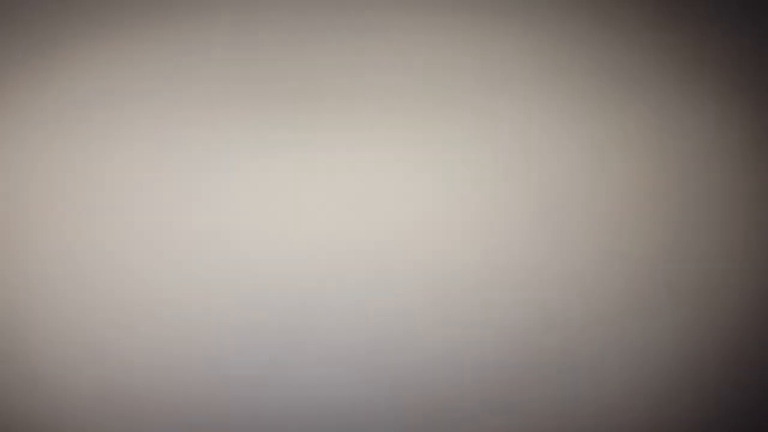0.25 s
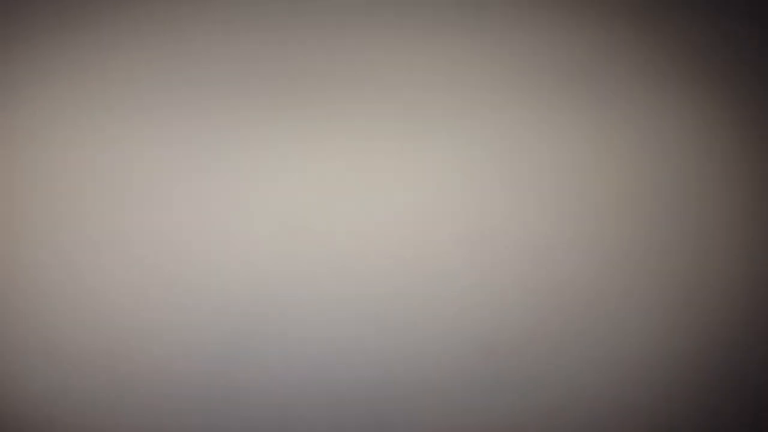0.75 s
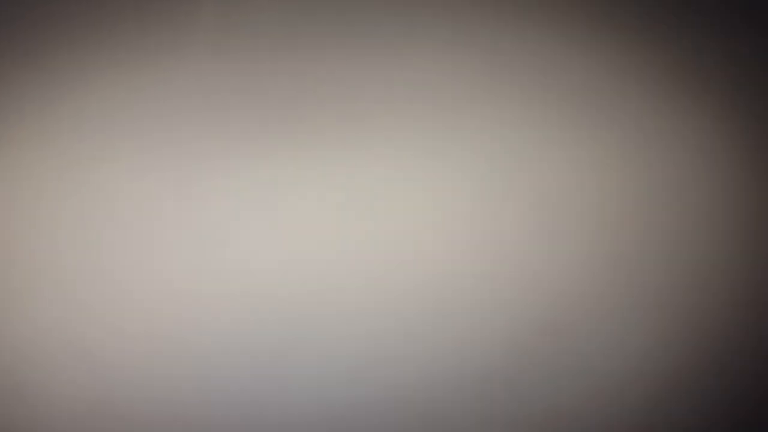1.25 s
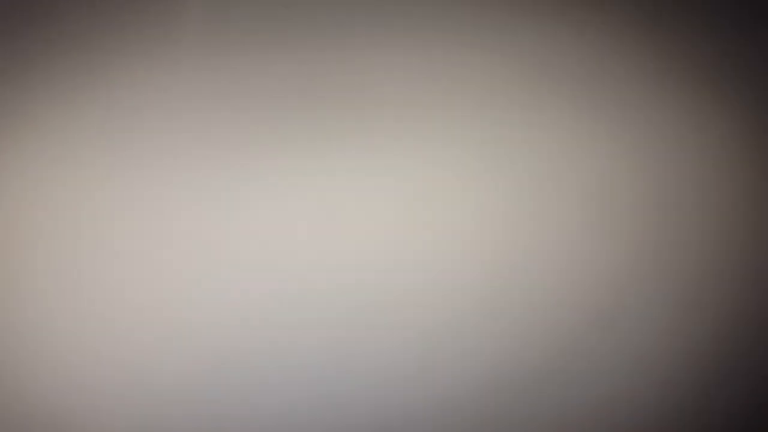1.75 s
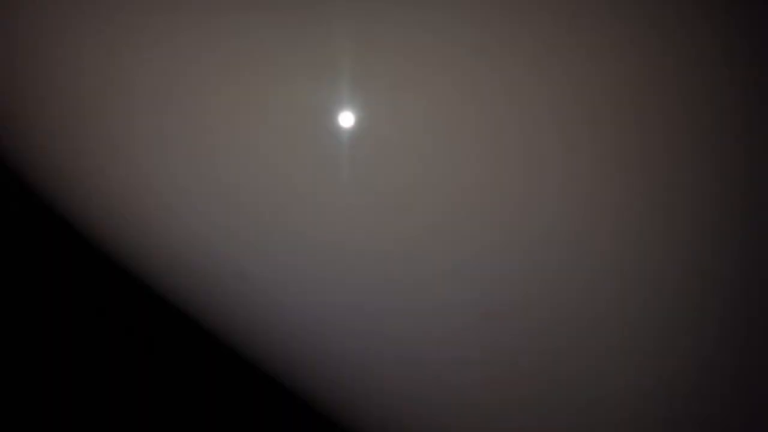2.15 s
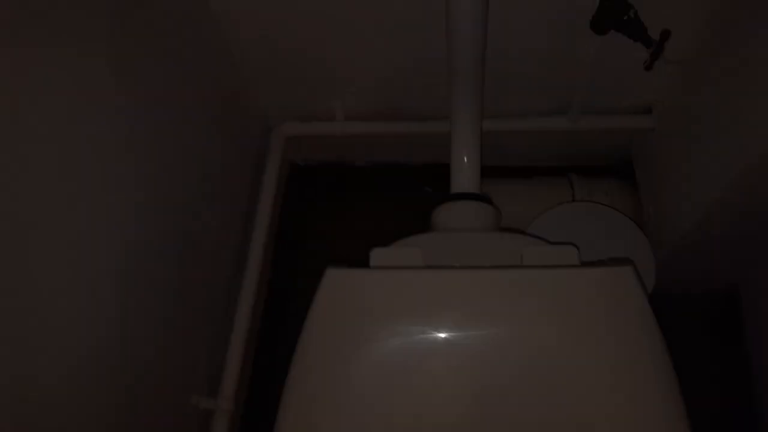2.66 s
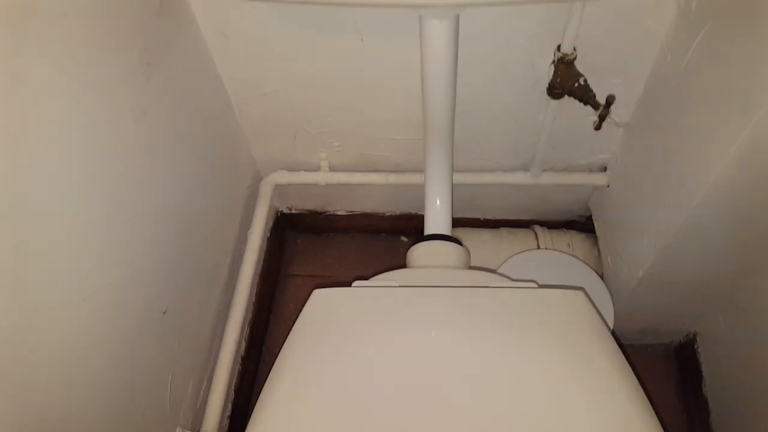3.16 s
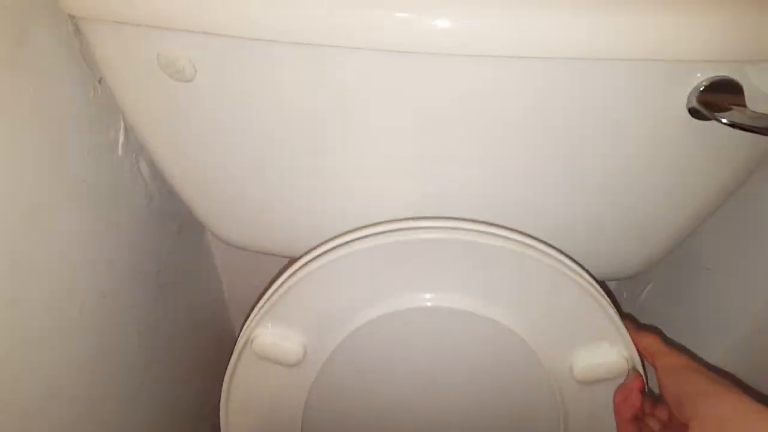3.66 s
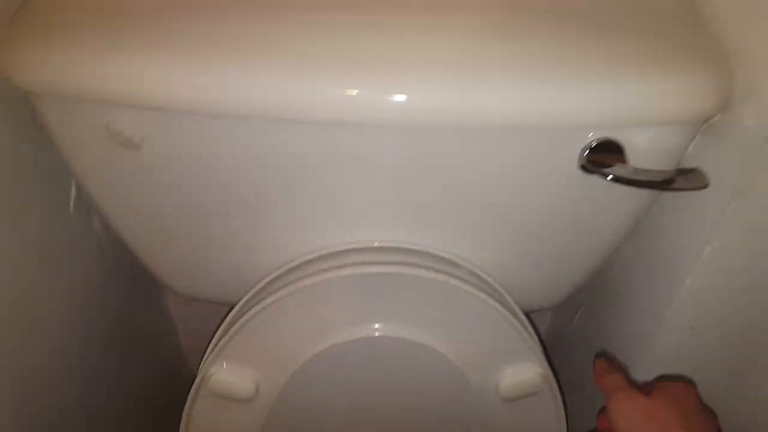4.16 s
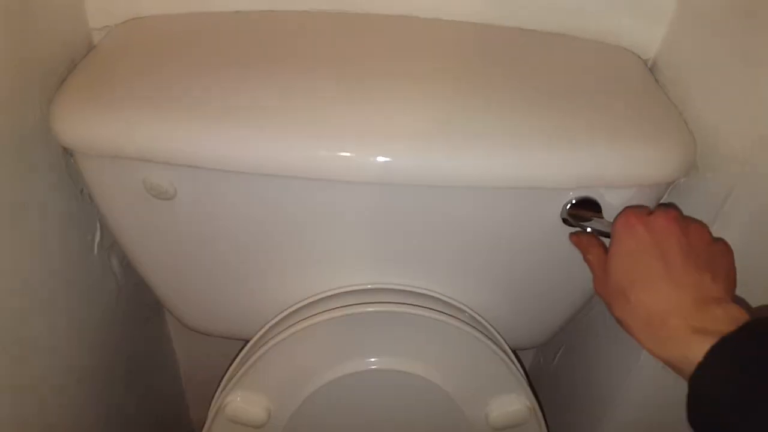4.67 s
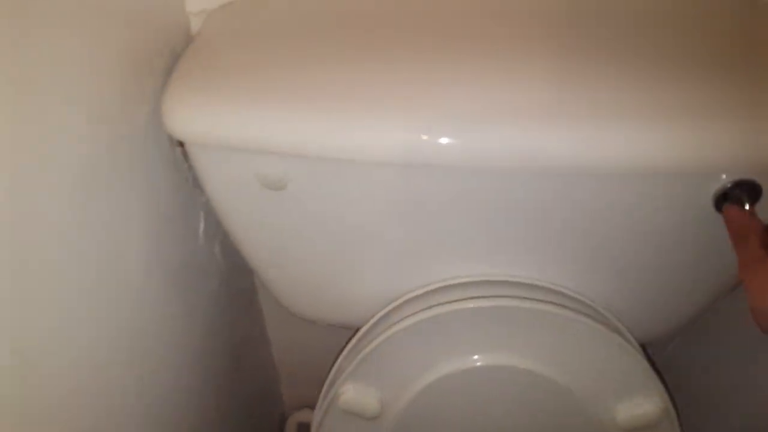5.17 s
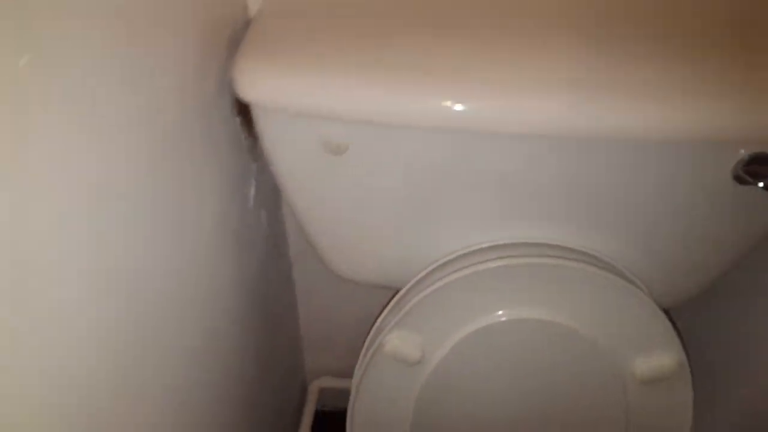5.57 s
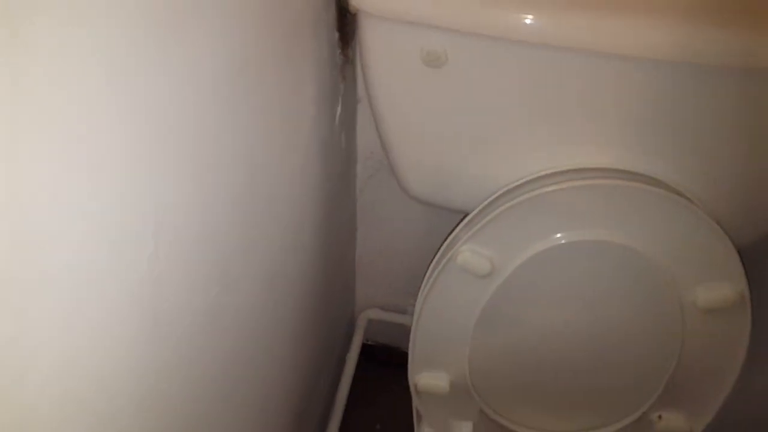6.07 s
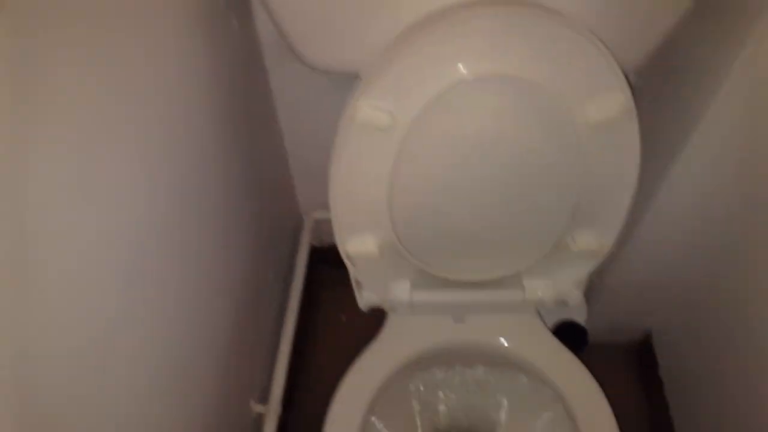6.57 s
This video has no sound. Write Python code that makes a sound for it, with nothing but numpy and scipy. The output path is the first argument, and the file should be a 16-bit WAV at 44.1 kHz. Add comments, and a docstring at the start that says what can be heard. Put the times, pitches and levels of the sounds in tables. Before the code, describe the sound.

Hollow porcelain knocks and a short drag, light plastic seat clatter, then a loud flush-lever clank and a trickle growing into splashing, bubbling toilet flush.

```python
"""Cistern lid, seat and flush in a tiled toilet cubicle

The porcelain lid is knocked, dragged and set down; the plastic seat lifts and falls against the cistern.
Fingers touch the lever, it clanks, and water trickles, then rushes into the bowl, heard by a hand-held phone.
Blows ring an object's modes and the air, with noise dying between the tiles; rubbing and water shape noise.
"""
import sys
import numpy as np
from scipy import signal
from scipy.fft import rfft, irfft, next_fast_len
from scipy.io import wavfile
from scipy.ndimage import uniform_filter1d, minimum_filter1d, map_coordinates

SR = 44100
rng = np.random.default_rng(int(sys.argv[2]) if len(sys.argv) > 2 else 0)


def dump(signal):
    """Clip the signal to [-1, 1] and save it as 16-bit WAV at the path in sys.argv[1]."""
    limited = np.clip(np.atleast_2d(signal).T, -1, 1)
    pcm = np.round(limited * 32767).astype(np.int16)
    wavfile.write(sys.argv[1], SR, pcm)


def level_to_linear(level):
    """Convert decibel levels to linear amplitude factors, elementwise."""
    exponent = np.asarray(level, float) / 20
    return 10 ** exponent


N = 300762

# air resonances of the cubicle: mode_hz, level_db, t60_s
AIR_MODES = [(63, -32.5, 0.36), (101.3, -27, 1), (141.2, 5, 0.3), (179.8, 1.5, 0.3), (238, 0.5, 0.12),
             (271.2, 2.5, 0.11), (358.1, 0, 0.17), (417, -4.5, 0.28)]
# building rumble colour: freq_hz, relative_db_per_hz
RUMBLE = [(15, -31.5), (25, -8), (65, -1), (194, 0.5), (253, -5), (316, -0.5), (448, -4), (545, -35.5),
          (700, -14.5), (910, -29.5), (1540, -120)]
# treble colour of background noise and rubbing: freq_hz, relative_db_per_hz
BRIGHT = [(1760, -28), (3000, -26), (3730, -9), (4170, -5), (5140, -8), (5920, -9), (13400, -13.5),
          (16000, -19.5)]
# balance of the lid between the ports: freq_hz, left_minus_right_db
LID_LEAN = [(60, 1.5), (240, -2), (800, 3), (3770, 1), (15000, 9.5)]
LID_LEAD_S = 0.00013  # the lid is nearer the left port


def unit(x):
    """Scale to rms 1."""
    return x / np.sqrt(np.mean(x ** 2) + 1e-20)


def along(points, hz):
    """Interpolate (Hz, value) points on a log axis."""
    f, v = np.transpose(points)
    return np.interp(np.log(hz + 1), np.log(f + 1), v)


def curves(rows):
    """One value per sample for each dB column; -120 dB from 30 ms outside the rows."""
    s, *cols = np.transpose(rows)
    s = np.r_[s[0] - .03, s, s[-1] + .03]
    return [np.interp(np.arange(N) / SR, s, np.r_[-120, c, -120]) for c in cols]


def wobble(rate_hz):
    """Smooth random curve through rate_hz random knots a second."""
    knots = rng.standard_normal(int(N * rate_hz / SR) + 4)
    return map_coordinates(knots, [np.arange(N) * rate_hz / SR])


def filtered(x, response):
    """Multiply the spectrum of x by a complex response of frequency."""
    m = next_fast_len(N + SR // 2)
    return irfft(rfft(x, m) * response(np.fft.rfftfreq(m, 1 / SR)), m)[..., :N]


def coloured(spectrum):
    """Gain of a (Hz, dB) spectrum."""
    return lambda hz: level_to_linear(along(spectrum, hz))


def lean(balance, lead_s=0):
    """Level and time difference between the ports."""
    half = np.array([[.5], [-.5]])
    return lambda f: level_to_linear(along(balance, f) * half) * np.exp(2j * np.pi * f * lead_s * half)


def turn(hz):
    """Angle between the two microphone ports: small in the bass, wide in the treble."""
    # likeness of the two ports: freq_hz, likeness_0_to_1
    alike = [(25, 1), (60, 0.8), (150, 1), (380, 0.9), (950, 0.16), (2380, 0), (5980, 0.049), (15000, 0)]
    return np.arccos(np.clip(along(alike, hz), 0, 1)) / 2


def rush(gain, patchy_db):
    """Stereo noise of rms 1, its gain varying in random patches of time and frequency."""
    z = signal.stft(rng.standard_normal((2, N)), nperseg=512)[2]
    field = uniform_filter1d(rng.standard_normal(z.shape[1:]), size=5, axis=0)
    field = uniform_filter1d(field, size=8, axis=1)
    pair = signal.istft(z * level_to_linear(patchy_db * unit(field)), nperseg=512)[1][:, :N]
    mid, side = filtered(pair, lambda hz: gain(hz) * [np.cos(turn(hz)), np.sin(turn(hz))])
    return unit(np.array([mid + side, mid - side]))


def ringing(modes):
    """Causal response of (Hz, dB, t60) modes: damped resonators."""
    return lambda f: sum(level_to_linear(db) * 1j * f * 2.2 / t60 / (hz * hz - f * f + 2.2j * f / t60)
                         for hz, db, t60 in modes)


def clatter(size):
    """Stereo noise in which each frequency dies as fast as the tiles let it."""
    # decay between the tiles: freq_hz, t60_s
    tiles = [(100, 0.54), (500, 0.29), (1500, 0.25), (4000, 0.22), (10000, 0.18)]
    hz, t, z = signal.stft(rng.standard_normal((2, size)), SR, nperseg=256)
    angle = turn(hz)[:, None]
    mid, side = z * level_to_linear(-60 * t / along(tiles, hz)[:, None]) * [np.cos(angle), np.sin(angle)]
    return signal.istft(np.array([mid + side, mid - side]), SR, nperseg=256)[1][:, :size]


def tiled(x, wet_db):
    """The sound plus its decaying, noise-like answer from the tiles."""
    tail = clatter(SR // 2)
    answer = signal.fftconvolve(x, tail / np.linalg.norm(tail[0]), axes=1)[:, :N]
    return x + level_to_linear(wet_db) * answer


def blows(table, colour_db, modes, boom_db, clatter_db, crack_db, spread, soft_s=0.00034):
    """Each row: a crack, the object's modes, the boom of the air and the clatter off the tiles."""
    # bands of a blow: centre_hz, width_hz
    bands = [(140, 120), (330, 300), (750, 500), (1800, 2000), (6000, 9000)]
    # share of a blow's weight_db reaching each band: share
    weight_share = np.array([0.83, 0.94, 0.2, 0.02, 0.38])
    # share of a blow's hardness_db reaching each band: share
    hard_share = np.array([0, 0.0056, 0.025, 0.32, 1])
    twin_hz, twin_share = 22, .22  # a weaker twin up to this far off makes each mode beat
    top_hz, top_db, top_share = 13000, -10, 0.15  # top treble re the 6 kHz band, raised by hardness
    rings, out = np.zeros((2, 2, N + SR))
    t, lead = np.arange(SR // 2) / SR, 512
    centre, width = np.transpose(bands)
    hz, level, t60 = np.transpose(AIR_MODES + modes)[..., None]
    level = level + boom_db * (np.arange(len(hz))[:, None] < len(AIR_MODES))
    contact = 1 - np.exp(-t / soft_s)
    rise = (1 - np.exp(-t * hz / 0.29)) ** 2 * contact  # about a cycle, more after a soft contact
    grid = np.fft.rfftfreq(len(t) + lead, 1 / SR)
    edges = grid ** 2 / (grid ** 2 + 110 ** 2) / (1 + (grid / 9000) ** 2)  # small objects radiate no deep bass
    for s, db, weight_db, hard_db in table:
        band_db = db + np.array(colour_db) + weight_db * weight_share + hard_db * hard_share
        mode_db = along(np.transpose([centre, band_db]), hz) + level
        size = level_to_linear(mode_db + rng.normal(0, 2.2, hz.shape))
        shift = spread * turn(hz) * rng.uniform(-6.5, 4.7, hz.shape)  # each mode reaches one port first
        beat = twin_hz * rng.uniform(.3, 1, hz.shape) * t + rng.random(hz.shape)
        size = size * (1 + twin_share * np.sin(2 * np.pi * beat))
        decay = size * rise * level_to_linear(-60 * t / t60)
        ring = [(decay * np.sin(2 * np.pi * hz * t + side * shift)).sum(axis=0) for side in (.5, -.5)]
        crack = 1 + level_to_linear(crack_db - 60 * t / 0.0085)
        noise = np.pad(clatter(len(t)) * crack * contact, ((0, 0), (lead, 0)))
        per_hz = np.transpose([centre, band_db + clatter_db - 10 * np.log10(width / (SR / 2))])
        per_hz = np.r_[per_hz, [[top_hz, per_hz[-1, 1] + top_db + top_share * hard_db]]]
        at = round(s * SR)
        rings[:, at:][:, :len(t)] += np.array(ring)
        out[:, at - lead:][:, :len(t) + lead] += irfft(rfft(noise) * level_to_linear(along(per_hz, grid)) * edges)
    return out[:, :N] + tiled(rings[:, :N], wet_db=-8.5)


def rubbing(rows, hiss_db, modes, ring_db, boom_db, rough_db, grit_db, rate_hz):
    """Uneven friction keeps the air, the object's modes and a gritty hiss going."""
    low_db, mid_db = curves(rows)
    grip_db = rough_db * wobble(rate_hz)

    def body(f):
        return level_to_linear(ring_db) * abs(ringing(modes)(f)) + 1

    def air(f):
        return level_to_linear(boom_db) * abs(ringing(AIR_MODES)(f))

    def below(f, hz):
        return 1 / (1 + (f / hz) ** 4)

    boom = rush(lambda f: (body(f) + air(f)) * (1 - below(f, 130)) * below(f, 590), patchy_db=3.5)
    ring = rush(lambda f: body(f) * (1 - below(f, 500)) * below(f, 3100), patchy_db=2.5)
    shrill = rush(lambda f: (body(f) + level_to_linear(grit_db)) * coloured(BRIGHT)(f) * below(f, 12000), patchy_db=2.5)
    return level_to_linear(low_db) * boom + level_to_linear(mid_db + grip_db) * ring + level_to_linear(mid_db + hiss_db + grip_db) * shrill


def bubbles(s, db, hz, pan_db, turns):
    """Short rising tones with a soft start, one per entry."""
    t = np.arange(1500) / SR
    age = t * hz[:, None] / turns
    swell = level_to_linear(db)[:, None] * age * np.exp(1 - age)
    tone = swell * np.sin(2 * np.pi * hz[:, None] * t * (1 + .012 * age))
    at = (np.round(s * SR).astype(int)[:, None] + np.arange(len(t))).ravel()
    return np.array([np.bincount(at, (tone * level_to_linear(side * pan_db)[:, None]).ravel(), N + len(t))[:N]
                     for side in (.5, -.5)])


def mic_hiss():
    """The microphone's own noise: steady coloured noise."""
    # hiss colour: freq_hz, relative_db_per_hz
    hiss = [(20, 7), (80, 12.5), (400, -8), (3000, -21.5), (16000, -29)]
    return level_to_linear(-59) * rush(coloured(hiss), patchy_db=-2.0)


def building():
    """Low noise of the building, its level drifting."""
    # building rumble: time_s, level_db
    rumble = [(0, -50.5), (.65, -47.5), (2.2, -50.5), (2.66, -60), (2.85, -46.5), (3.7, -49), (4.63, -54),
              (4.85, -40.5)]
    rumble_db, = curves(rumble)
    return level_to_linear(rumble_db + 1.1 * wobble(44)) * rush(coloured(RUMBLE), patchy_db=4.5)


def air_noise():
    """Background air noise, a dull and a bright layer whose level dips and recovers together."""
    # background air noise: time_s, level_db
    floor = [(0, -48), (.156, -53), (.634, -55.5), (.756, -47), (.888, -56), (1.05, -55.5), (1.65, -49),
             (1.78, -91.5), (1.98, -50.5), (2.12, -56.5), (2.42, -54.5), (2.66, -61.5), (2.8, -55.5),
             (3.17, -55), (3.28, -56), (3.43, -48.5), (3.54, -54), (3.7, -53.5), (3.95, -54), (4.35, -62.5),
             (4.85, -60.5)]
    # dull layer's colour: freq_hz, relative_db_per_hz
    dull = [(290, -25), (500, -6), (529, -3.5), (676, -7.5), (1340, -10.5), (1700, -9.5), (3500, -15.5),
            (4550, -57), (7700, -120)]
    bright_db = -6  # re the dull layer
    floor_db, = curves(floor)
    flicker = wobble(14)
    return (level_to_linear(floor_db + 0.5 * flicker) * rush(coloured(dull), patchy_db=3.0)
            + level_to_linear(floor_db + bright_db + 1.2 * flicker) * rush(coloured(BRIGHT), patchy_db=.6))


def low_hum():
    """Low wavering hum, dropping sharply near 1.7 s, then slowly creeping back."""
    # hum tones: pitch_hz, waver_knots_per_s, level_db (before the gain curve)
    tones = [(184, 14, -53), (257, 17, -56), (763, 8.08, -67), (1730, 6.9, -76.5)]
    # gain curve of the hum: time_s, gain_db
    gain = [(0, 4), (.7, 1.5), (1.6, 4), (1.75, -30), (6.82, -10)]
    t = np.arange(N) / SR
    hum = 0
    for hz, rate_hz, db in tones:
        level = level_to_linear(db + 1.0 * wobble(rate_hz)) * np.sqrt(2)
        hum = hum + level * np.sin(2 * np.pi * hz * t + 1.4 * wobble(rate_hz))
    gain_db, = curves(gain)
    return level_to_linear(gain_db) * filtered(hum, lean(LID_LEAN, LID_LEAD_S))


def hinge():
    """Faint breathy whistle of the seat hinge: noise in resonant bands."""
    # seat swinging up: time_s, level_db
    swing = [(3.4, -49), (3.68, -76), (3.75, -53), (3.89, -67)]
    # whistle bands: centre_hz, half_width_hz, level_db
    bands = [(2140, 120, -2), (12200, 700, -11)]
    swing_db, = curves(swing)
    whistle = rush(lambda f: sum(level_to_linear(db) / (1 + ((f - hz) / w) ** 2) for hz, w, db in bands), patchy_db=7.0)
    return level_to_linear(swing_db) * whistle


def fingers():
    """Soft, modeless touches of the fingers, booming in the air."""
    # touches: start_s, level_db, weight_db (bass), hardness_db (treble)
    touches = [(2.264, -62, -13, 21), (2.545, -67, -13, 20), (2.574, -61.5, -2, 14), (4.612, -53.5, -8, -2),
               (4.743, -14.5, -22.5, -33.5), (4.865, -27.5, -14, -31)]
    # colour of skin contact: band_db
    skin_db = (1.3, 6.6, 0.5, 3.6, 0.5)
    return blows(touches, skin_db, [], boom_db=-6.5, clatter_db=-4, crack_db=-49, spread=0.78)


def seat():
    """The plastic seat lifts and falls, each knock ringing its modes."""
    # seat knocks: start_s, level_db, weight_db (bass), hardness_db (treble)
    knocks = [(2.737, -53, -3.5, 1), (2.94, -65.5, 20, 3), (2.96, -33.5, -5.5, -6.5),
              (3.022, -58, 10.5, 12), (3.077, -46.5, -4, -22), (3.11, -81, -7.5, 31.5),
              (3.153, -64, -8, 10), (3.227, -46, -4, -17.5), (3.342, -58.5, 4.5, 22.5),
              (3.384, -56.5, -1.5, 6), (3.542, -64.5, -0.5, 22.5), (3.62, -78, -15, 24),
              (3.662, -70.5, 9, 20.5), (3.897, -23, -16.5, 7.5), (3.915, -37, 2, -9), (4.088, -41, -8, -45),
              (4.21, -53, -2, -34.5)]
    # colour of a knock on plastic: band_db
    plastic_db = (5, 1.5, -1.5, 5, 1.96)
    # seat resonances: mode_hz, level_db, t60_s
    modes = [(910, -4, .2), (1217, -6, .2), (1397, 0, .16), (1577, -1, .14), (1653, -2, .12),
             (1814, -3, .13), (2140, -1, .12), (2412, 3, .13), (3500, -6, .06), (4900, -8, .05)]
    # seat balance between the ports: freq_hz, left_minus_right_db
    balance = [(60, 1), (240, -1.5), (950, 2), (3770, 1.5), (15000, 15.5)]
    knocking = blows(knocks, plastic_db, modes, boom_db=9.0, clatter_db=3, crack_db=8, spread=0.81)
    return filtered(knocking, lean(balance))


def lever():
    """The lever thumps the cistern water and clanks, the full cistern's ring swells, the linkage rubs."""
    # lever going down: start_s, level_db, weight_db (bass), hardness_db (treble)
    plunge = [(4.953, -18, 0, 0)]
    # colour of the plunge: band_db
    plunge_db = (-29, 14.5, 7.5, -4, -35)
    # cistern under that thump: mode_hz, level_db, t60_s
    slosh_modes = [(352, 1, 0.28), (402, -4.5, .3), (581.4, -0.5, 0.21), (673, -6.5, 0.4), (1078, -5, 0.11)]
    # lever clank and the swells of its ring: start_s, level_db, weight_db (bass), hardness_db (treble)
    clank_and_swells = [(5.083, -11, 3.5, 0), (5.104, -11, -5, 0), (5.124, -7.5, -13, 0),
                        (5.199, -16, -4, -3), (5.212, -14.5, 1.5, 0.55), (5.232, -19, -1.5, -1)]
    # colour of the lever's ring: band_db
    lever_db = (-1.5, -21, 1.5, 2.5, -13)
    # lever resonances: mode_hz, level_db, t60_s
    lever_modes = [(1292, -2, .12), (1340, 0, .14), (1378, 2, .13), (1425, 4, .2), (2500, -6, .07),
                   (3940, -6, .07)]
    # colour of the cistern's ring: band_db
    tank_db = (-7.5, -10, 6.5, 4.5, -6.5)
    # cistern resonances: mode_hz, level_db, t60_s
    tank_modes = [(364.2, -2.5, 0.35), (437, 1, 0.21), (568, -6.5, 0.35), (763, 3, 0.21), (840, 0, .18),
                  (1115, -9.5, 0.27), (1214, 1, 0.13), (1368, -2, 0.29), (1435, -12, .2), (1709, 7.5, 0.17),
                  (1950, -9, .14), (2078, -9, .14), (2320, -1, 0.18), (2345, -2, .18), (2495, -4, .15),
                  (2690, -4, 0.14), (2745, -6, .14), (3004, -2, 0.16), (3405, -2.5, 0.17),
                  (3860, -4.5, 0.15), (4380, -24, 0.11), (4970, -9, 0.16), (5460, -5.5, 0.098)]
    # linkage rubbing: time_s, rumble_db, scrape_db
    linkage = [(4.86, -61, -51), (4.898, -40, -38), (4.942, -39, -45), (4.966, -22, -23),
               (5.01, -11, -27.5), (5.04, -14.5, -25.5), (5.078, -13, -25), (5.088, -11, -5),
               (5.185, -11, -16), (5.246, -15.5, -11), (5.3, -19.5, -24.5), (5.352, -28, -44),
               (5.42, -32, -43)]
    struck = 0
    for rows, colour_db, modes, soft_s in ((plunge, plunge_db, slosh_modes, .005),
                                           (clank_and_swells, lever_db, lever_modes, .0002),
                                           (clank_and_swells, tank_db, tank_modes, .017)):  # cistern rings late
        struck = struck + blows(rows, colour_db, modes, boom_db=-2.5, clatter_db=-8, crack_db=-23.0,
                                spread=0.15, soft_s=soft_s)
    # re the scrape: less hiss once the lever has clanked
    hiss_db = np.where(np.arange(N) / SR < clank_and_swells[0][0], -11.5, -24.5)
    return struck + rubbing(linkage, hiss_db, tank_modes, ring_db=12, boom_db=7.5, rough_db=1.2,
                            grit_db=35.0, rate_hz=60)


def flush_pipe(pipe_db):
    """The flush pipe drones: a wavering tone and noise peaked at its air column."""
    # pipe noise colour: freq_hz, relative_db_per_hz
    colour = [(24, -78.5), (40, -28.5), (113, -5), (155, -22), (185, -6), (306, -1), (345, -7), (428, 0.5),
              (513, -11), (700, -7.5), (910, -6.5), (1540, -120)]
    # air column of the pipe: mode_hz, width_hz, level_db (before a threefold gain)
    column_modes = [(333.6, 38, -0.5)]
    drone_hz, drone_db = 345.3, -5
    phase = 1.5 * (wobble(45) + 2 * wobble(12))
    drone = level_to_linear(drone_db) * np.sin(2 * np.pi * drone_hz * np.arange(N) / SR + phase)

    def column(f):
        return 1 + sum(3 * level_to_linear(db) / (1 + (2 * (f - hz) / w) ** 2) for hz, w, db in column_modes)

    noise = rush(lambda f: coloured(colour)(f) * column(f), patchy_db=.5)
    return level_to_linear(pipe_db - 2 + 1.0 * wobble(40)) * (drone + noise)


def splash_and_fizz(flow_db):
    """Surging noise of the bowl's splash and its fizzing spray."""
    # splash colour: freq_hz, relative_db_per_hz
    splash_colour = [(290, -55), (500, -33), (739, 6), (937, -25), (1060, -3), (1230, 3), (1570, -5.5),
                     (1700, 2), (2570, 1.5), (3800, -15), (4940, -54), (8360, -120)]
    # fizz colour: freq_hz, relative_db_per_hz
    fizz_colour = [(2000, -10.5), (3400, 3), (4050, 0), (8210, -5.5), (9220, -7.5), (10600, -10),
                   (12400, -11.5), (15000, -18.5), (16000, -19)]
    fizz_db = flow_db - 8.5 - 0.32 * np.maximum(flow_db + 21.5, 0)  # grows more slowly above a -21.5 dB flow
    surge = wobble(6.8)
    splash = level_to_linear(flow_db - 6 + 2 * surge + 2.2 * wobble(70)) * rush(coloured(splash_colour), patchy_db=3.8)
    fizz = level_to_linear(fizz_db + .7 * surge + 1.1 * wobble(60)) * rush(coloured(fizz_colour), patchy_db=1.2)
    return splash + fizz


def froth(flow_db, start_s):
    """1200 random bubbles that follow the flow, thickening with time."""
    draw = rng.random((1200, 4))
    s = start_s + np.sqrt(draw[:, 0]) * (N / SR - start_s)
    hz = 1000 * 2.8 ** draw[:, 1]
    db = flow_db[(s * SR).astype(int)] - 16.0 - 3.1 * np.log(draw[:, 2] + 0.041)  # many small, a few large
    short = bubbles(s, db, hz, 8 * (draw[:, 3] - .5), turns=3.2)
    # one in five sings on
    singing = bubbles(s[::5] + .01, db[::5] - 10, hz[::5] * .9, 0 * s[::5], turns=10)
    return tiled(short + singing, wet_db=4.0)


def drops():
    """Single drops: a bubble's tone and a lower, briefer landing tick."""
    # drops: start_s, level_db, pitch_hz, left_minus_right_db
    drop_rows = [(5.543, -44, 10900, 18), (5.544, -38.5, 2740, -3), (5.5762, -53, 7060, 17),
                 (5.73, -52, 9420, 24), (5.7873, -39.5, 1310, 9), (5.8556, -47, 8440, 10.5),
                 (5.96, -39.5, 3460, -3), (6.0153, -39, 8200, 13), (6.13, -28.5, 2600, 3),
                 (6.13, -30, 2950, 5), (6.248, -20, 8750, 13), (6.247, -24, 3050, 4),
                 (6.261, -23.5, 2320, 8), (6.262, -29, 1380, 11), (6.307, -21.5, 2230, 8),
                 (6.385, -22.5, 1203, 5), (6.3591, -17, 6700, -1), (6.425, -25, 9200, 22),
                 (6.481, -16.5, 2590, 9), (6.484, -20, 2210, 7), (6.493, -26, 8500, 8),
                 (6.5241, -15.5, 1130, -6), (6.538, -20, 1108, -2), (6.536, -18, 2210, 0),
                 (6.578, -14, 1800, 0), (6.611, -17, 1445, 2), (6.64, -20, 1510, 3),
                 (6.642, -20.5, 2750, 0), (6.662, -20, 1110, -2), (6.69, -19, 1400, 0),
                 (6.701, -23, 8340, 13), (6.742, -19, 1056, 0), (6.771, -17, 1700, 1.5)]
    s, db, hz, pan_db = np.transpose(drop_rows)
    tones = bubbles(s, db, hz, pan_db, turns=5.6)
    ticks = bubbles(s, db + 2, hz * 0.59, pan_db, turns=0.34)
    return tiled(tones + ticks, wet_db=-4)


def glug():
    """The first slug of water leaves the pipe: a blow that only the air answers."""
    # slug: start_s, level_db, weight_db (bass), hardness_db (treble)
    slug = [(6.174, -30, 0, 0)]
    # colour of the slug: band_db
    glug_db = (-8.5, 12.5, -24, -1, 8)
    return blows(slug, glug_db, [], boom_db=1.0, clatter_db=-3.0, crack_db=-1, spread=0.36)


def water():
    """Water trickles, then rushes: pipe, splash, fizz and froth follow the flow, with drops and a glug."""
    # flow before each layer's trim: time_s, pipe_db, bowl_flow_db
    flow = [(5.33, -53, -45), (5.438, -35.5, -42), (5.596, -38, -42.5), (5.646, -43, -49),
            (5.82, -36.5, -41), (5.866, -41, -42.5), (6.078, -37.5, -39.5), (6.168, -35.5, -28.5),
            (6.176, -22, -36), (6.214, -28, -32), (6.32, -20, -22.5), (6.42, -21.5, -19),
            (6.522, -25, -16.5), (6.61, -22, -18), (6.704, -17, -17), (6.82, -26, -17)]
    # water balance between the ports: freq_hz, left_minus_right_db
    balance = [(60, -1.5), (240, -0.5), (950, 2.5), (4500, 1), (8500, 6.5), (15000, 14)]
    pipe_db, flow_db = curves(flow)
    stream = flush_pipe(pipe_db) + splash_and_fizz(flow_db) + froth(flow_db, flow[0][0])
    return filtered(stream, lean(balance)) + drops() + glug()


def lid():
    """The porcelain lid is knocked, dragged with snags, lifted off and set down."""
    # lid knocks, and a swell in the second one's ring: start_s, level_db, weight_db (bass), hardness_db (treble)
    knocks_and_swell = [(0.717, -21.5, 11.5, 6.5), (0.732, 4, -6.5, -19.5), (0.778, -14.5, 3.5, -20),
                        (0.976, -15, 11, 8.5)]
    # colour of the lid's ring: band_db
    lid_db = (-10.5, -1.5, -3, -17.5, -37.5)
    # lid resonances: mode_hz, level_db, t60_s
    modes = [(553, -10, 0.15), (800, -12, 0.3), (755.5, 7, 0.22), (711, -22, 0.38), (867, -19, 0.18),
             (980, -25, .17), (1263, -5, 0.25), (1402, -5, 0.069), (1676, 1.5, 0.17), (2336, -6.5, 0.36),
             (2710, -7, 0.088), (3370, -19, 0.14), (3780, -12, .12), (4380, -19, 0.1)]
    # the dragged lid catches: start_s, level_db, weight_db (bass), hardness_db (treble)
    snags = [(1.147, -25.5, 0, 20.5), (1.212, -30.5, -5, 15), (1.229, -13.5, -7.5, -12)]
    # the lid leaves its rest: start_s, level_db, weight_db (bass), hardness_db (treble)
    lift_off = [(1.447, -21, 0.0065, 0.0086)]
    # the freed lid sings a little lower: mode_hz, level_db, t60_s
    free_modes = [(718, 0.0029, 0.32)]
    # setting down: start_s, level_db, weight_db (bass), hardness_db (treble)
    set_down = [(1.646, -4.5, 1, 10), (1.751, -13, -0.63, -10), (2.005, -10, -0.81, 4)]
    # colour of setting down: band_db
    resting_db = (-2, 2, -2.5, -15, -47.5)
    # the lid lying on the cistern: mode_hz, level_db, t60_s
    resting_modes = [(250, 13, 0.022), (527, -10, 0.18), (592.7, -2.5, 0.15), (681, -6, 0.18),
                     (763, -2.5, 0.098), (821, -2, 0.11), (887, -11.5, 0.13), (1282, 1, 0.16),
                     (1383, -1.5, 0.17), (1708, 2, 0.12), (2083, -5, 0.077), (2200, -7, 0.16),
                     (2719, -3.5, 0.19), (3010, 0, 0.1), (3440, -2, .07), (3900, -0.5, 0.07)]
    # dragging: time_s, rumble_db, scrape_db
    drag = [(1.132, -48, -33.5), (1.156, -35, -38.5), (1.208, -32.5, -33), (1.234, -13, -36),
            (1.268, -27, -35.5), (1.358, -24, -33), (1.44, -18, -19.5), (1.56, -33, -49.5),
            (1.62, -48.5, -58)]
    # high tones that only rubbing wakes: mode_hz, level_db, t60_s
    squeal_modes = [(4969, -9, .12), (5300, -14, .12), (5647, -12, .12), (6200, -10, .1), (6735, -11, .1),
                    (7079, -11, .1), (8382, -13, .08), (9383, -4, .08)]
    held_modes = [(hz, db, 0.7 * t60) for hz, db, t60 in modes]  # dragging shortens the ring
    out = blows(knocks_and_swell, lid_db, modes, boom_db=-5.5, clatter_db=-10.5, crack_db=0.0, spread=0.84,
                soft_s=0.00077)
    out += blows(snags, lid_db, held_modes, boom_db=-4.0, clatter_db=-6.0, crack_db=-9.5, spread=0.46,
                 soft_s=0.0019)
    out += blows(lift_off, lid_db, free_modes, boom_db=-14.5, clatter_db=-29.0, crack_db=-29, spread=0.17,
                 soft_s=0.0058)
    out += blows(set_down, resting_db, resting_modes, boom_db=-3.5, clatter_db=-8, crack_db=4.0, spread=0.3)
    out += rubbing(drag, -25.5, modes + squeal_modes, ring_db=27, boom_db=28, rough_db=2.5, grit_db=-6, rate_hz=70)
    return filtered(out, lean(LID_LEAN, LID_LEAD_S))


def lingering(x):
    """Add the building's low rumbling answer: x convolved with decaying noise."""
    linger_db, linger_t60_s = -21.5, 0.77
    t = np.arange(SR) / SR
    decay = (1 - np.exp(-t / .04)) * level_to_linear(-60 * t / linger_t60_s)
    tail = unit(rng.standard_normal(SR) * decay) / np.sqrt(SR)
    return x + level_to_linear(linger_db) * filtered(signal.fftconvolve(x.mean(axis=0), tail)[:N], coloured(RUMBLE))


def scene():
    """All sources in the cubicle."""
    # balance of fingers and lever: freq_hz, left_minus_right_db
    lever_lean = [(60, 1.5), (240, 0), (950, 5), (3770, 1.5), (15000, 18.5)]
    handled = lid() + seat() + filtered(fingers() + lever(), lean(lever_lean))
    return lingering(handled) + hinge() + water() + building() + air_noise() + low_hum()


def limited(x, ceiling_db, attack_s, release_s):
    """Gain control: ducks a few ms after a loud peak, lets go slowly."""
    over_db = np.minimum(ceiling_db - 20 * np.log10(abs(x).max(axis=0) + 1e-9), 0)
    held_db = minimum_filter1d(over_db, size=801, origin=400)

    def lag(tau_s):
        return signal.lfilter([1 / (tau_s * SR)], [1, 1 / (tau_s * SR) - 1], held_db)

    return x * level_to_linear(np.minimum(lag(attack_s), lag(release_s)))


def roll_off(x):
    """The treble ends steeply here."""
    return signal.sosfilt(signal.butter(12, 16670, fs=SR, output="sos"), x)


def record(dry):
    """The microphone adds hiss and drops deep bass and the top; gain control and soft clipping follow."""
    # microphone response: freq_hz, gain_db
    mic = [(20, -13), (60, -8), (140, -2.5), (9500, -2), (11000, -4.5), (15300, -2.5), (15900, -8.5),
           (16600, -27.5)]
    heard = filtered(dry + mic_hiss(), coloured(mic))
    heard = limited(heard, ceiling_db=-2.5, attack_s=.006, release_s=.06)
    rounded = heard / (1 + abs(heard / 1.2) ** 6) ** (1 / 6)  # peaks bend towards 1.2
    return roll_off(rounded)


dry = scene()
out = record(dry)
dump(out)
```